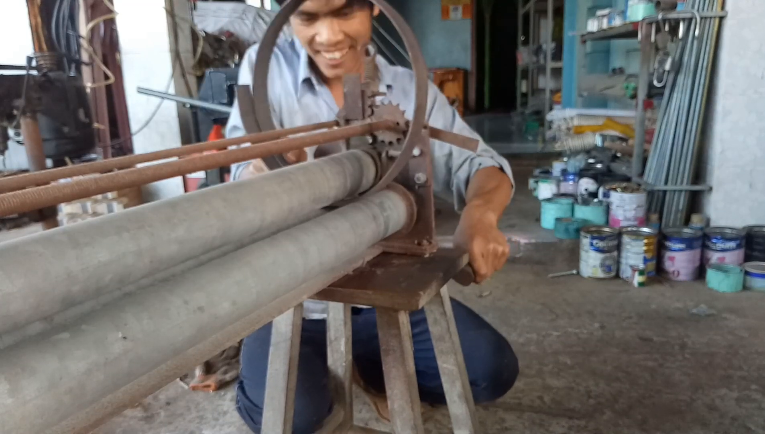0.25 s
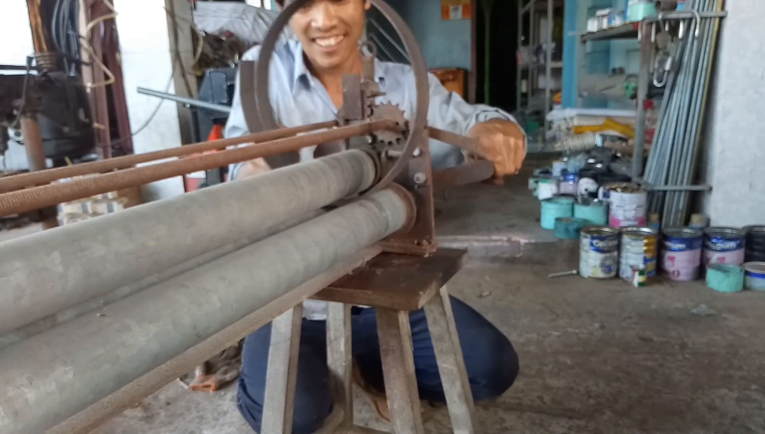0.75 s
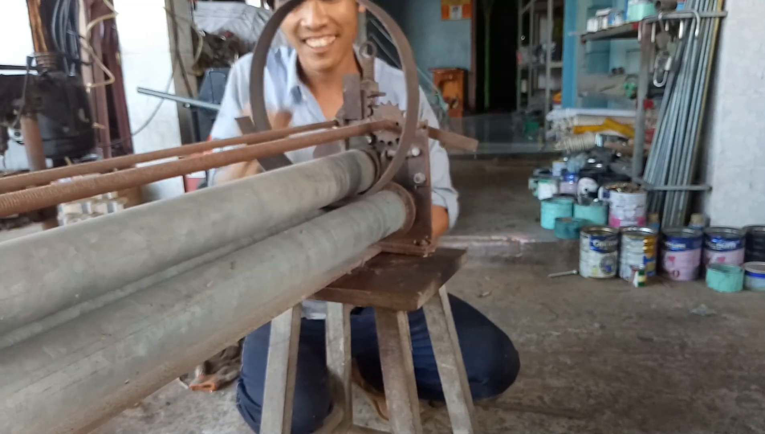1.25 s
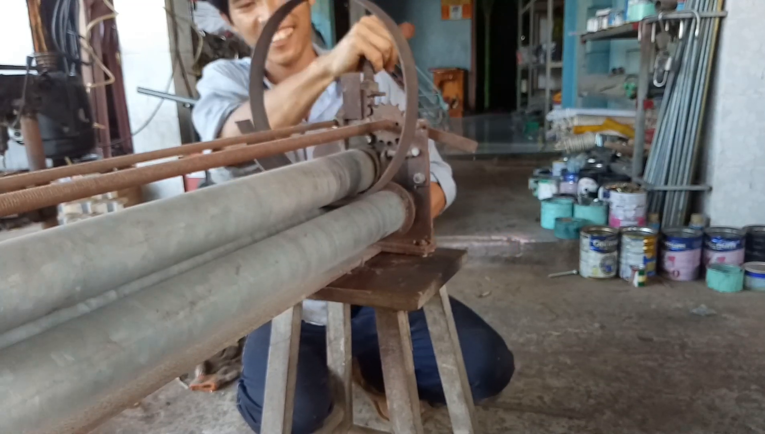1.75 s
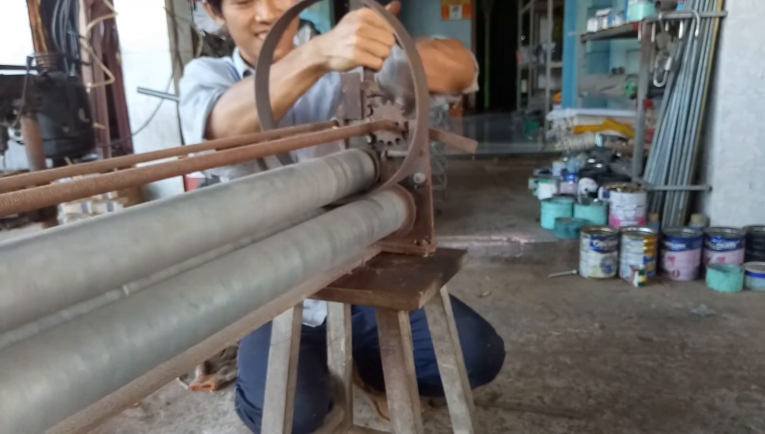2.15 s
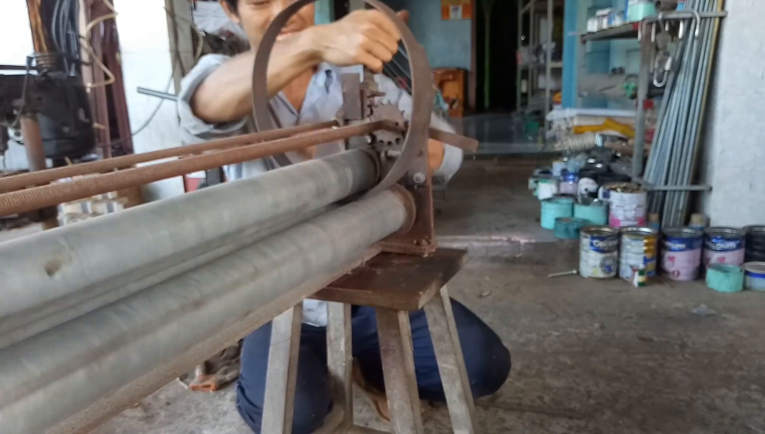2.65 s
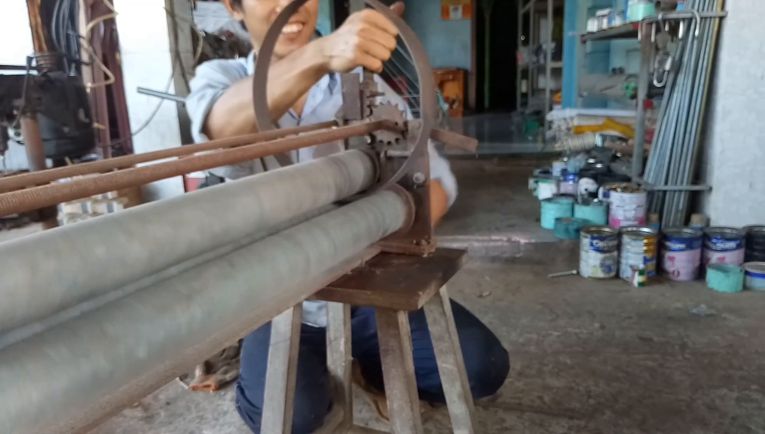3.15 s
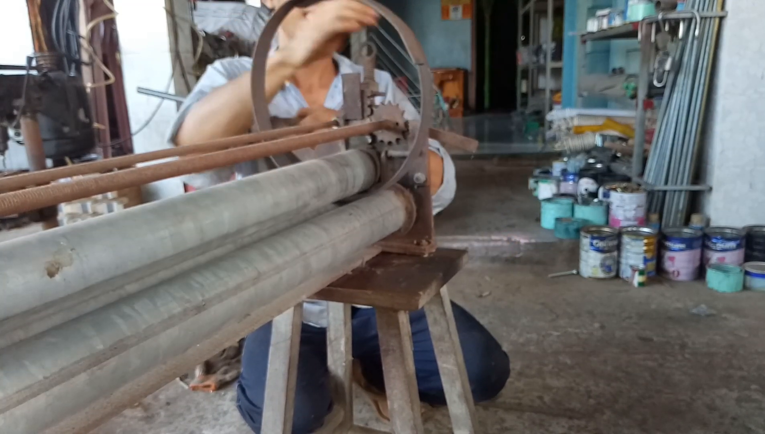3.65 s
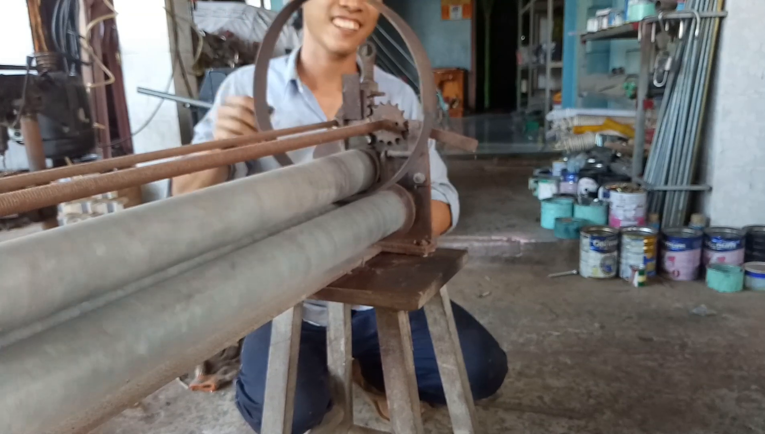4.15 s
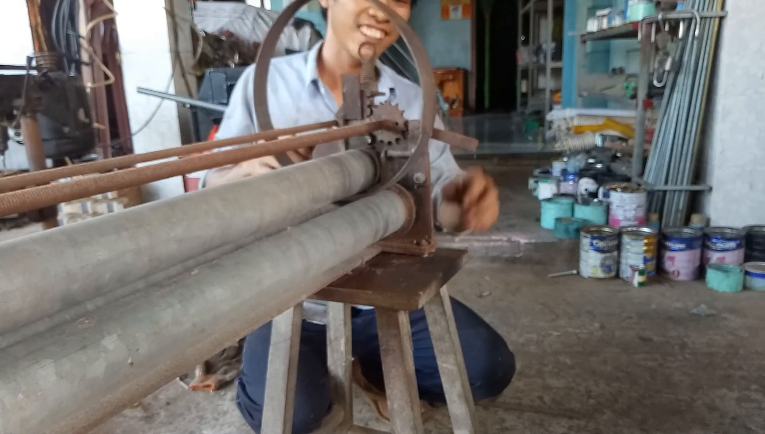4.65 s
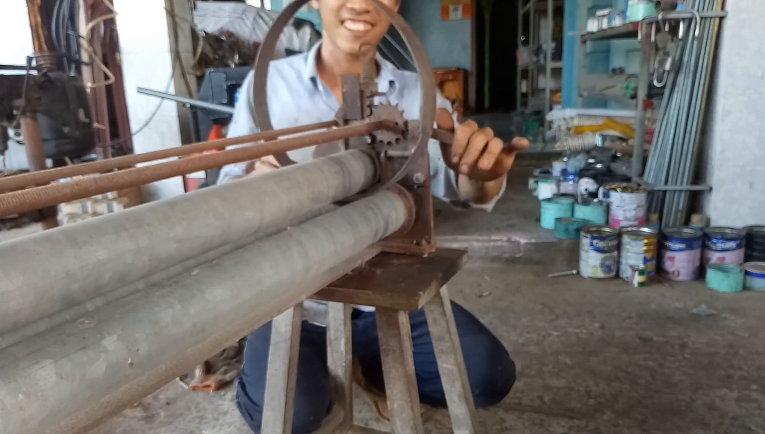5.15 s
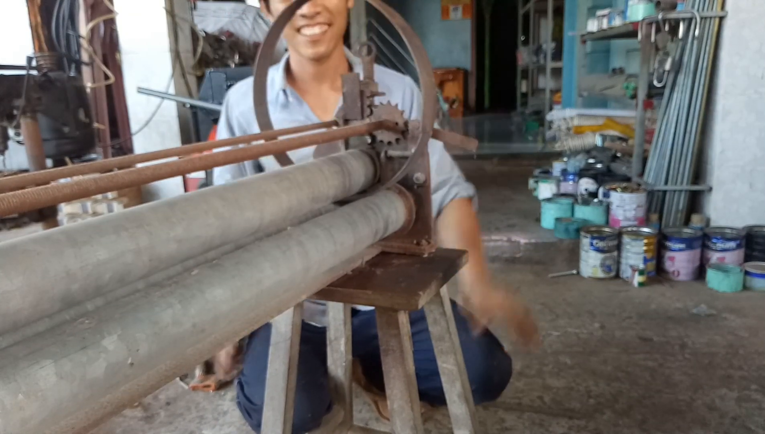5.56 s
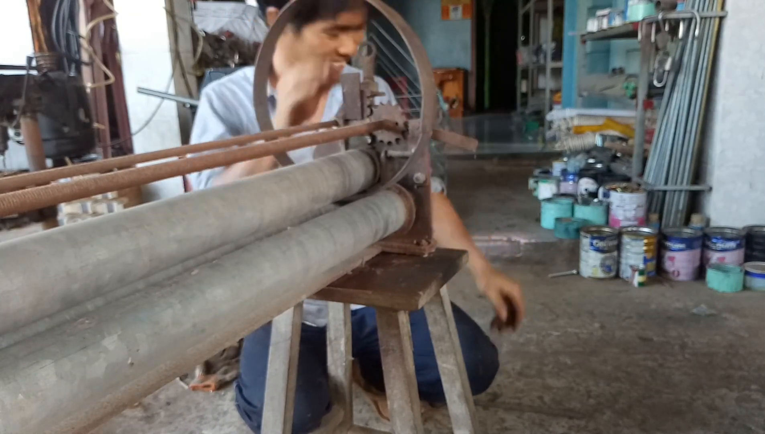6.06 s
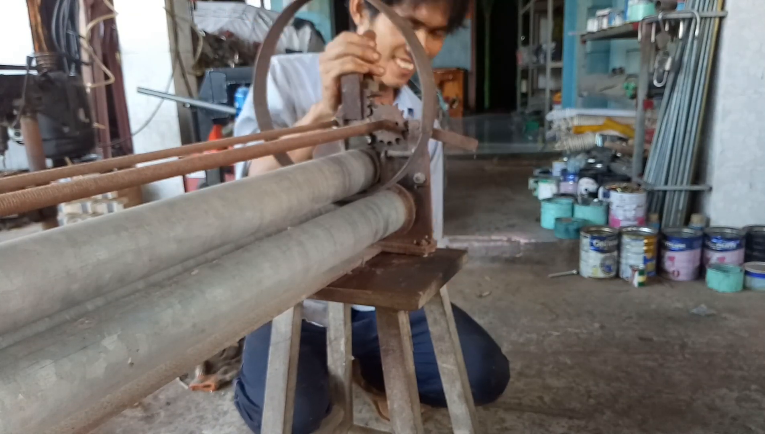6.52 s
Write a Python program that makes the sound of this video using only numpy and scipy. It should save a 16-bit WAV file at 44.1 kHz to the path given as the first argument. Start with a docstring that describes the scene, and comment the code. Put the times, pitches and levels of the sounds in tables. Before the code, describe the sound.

Loose gears and a crank bang sharply on a steel frame in an open workshop, with gritty grinding, tubular ringing and low traffic hum.

```python
"""An open workshop with a hand-cranked rolling machine: loose gears and the crank clank against a steel frame,
each blow a set of decaying sines over bursts of coloured noise. The teeth grind as noise heard through the frame,
the long hollow rollers keep ringing as slowly dying tones, and the stand knocks and a loose part taps.
Low hum and rumble of traffic lie behind as filtered noise, and their level drops after the last hard blow;
the blows leave a short tail in the shop.
"""
import sys
import numpy as np
from scipy import signal
from scipy.fft import rfft, irfft, next_fast_len
from scipy.io import wavfile
from scipy.ndimage import uniform_filter1d, map_coordinates

SR = 44100
rng = np.random.default_rng(int(sys.argv[2]) if len(sys.argv) > 2 else 0)


def store_wav(level_fs):
    """Save 16-bit WAV to argv[1]."""
    pcm = np.round(np.clip(np.atleast_2d(level_fs), -1, 1) * 32767)
    wavfile.write(sys.argv[1], SR, pcm.T.astype(np.int16))


def field_ratio(decibels):
    """Amplitude ratio for a level in dB (20 dB per decade); scalars and array-likes work."""
    return 10 ** (np.asarray(decibels, dtype=float) / 20)


N = 299439  # length [samples]

# All spectra are relative: their noise is levelled afterwards.
# quiet air of the shop: (frequency [Hz], density [dB per Hz])
AIR_SPECTRUM = [(150, -33.5), (250, -12.5), (600, -8.5), (1500, -20), (3600, -37.5), (4500, -9.5),
                (5000, -34), (10000, -34.5), (15800, -41)]
AIR_DB = -76  # rms level
# low background rumble: (frequency [Hz], density [dB per Hz])
RUMBLE_SPECTRUM = [(15, -34.5), (25, -23.5), (40, -16.5), (65, -11.5), (100, -3), (125, 2.5), (150, -10.5),
                   (250, -53.5)]
# far engine hum, resonances before squaring: (frequency [Hz], width [Hz], level [dB])
ENGINE_RESONANCES = [(148.8, 8.5, -0.5), (184.5, 8.5, -1.5), (208.5, 7.7, -3.5), (245, 35, -9),
                     (340, 32, -11)]
# level of the low background hum and rumble, which drops after the last hard blow:
# (time [s], engine hum level [dB], rumble level [dB])
BACKGROUND_LEVELS = [(0.0, -52.5, -57.5), (2.0, -49, -57.5), (2.5, -51, -57.5), (3.3, -45, -57.5),
                     (3.65, -63, -56), (5.07, -67.5, -59), (5.35, -79, -73.5), (6.17, -65, -60),
                     (6.79, -78, -79)]
# tail of the workshop: (frequency [Hz], 60 dB fall time [s])
SHOP_DECAY = [(300, 0.63), (2000, 0.34), (5000, 0.42), (12000, 0.1), (16000, 0.05)]

# hollow knocks in the stand: (time [s], knock level [dB], pitch [Hz])
STAND_KNOCKS = [(0.453, -34.5, 833), (0.515, -44.5, 1040), (0.803, -33.5, 1020), (0.842, -32.5, 1100),
                (1.129, -35.5, 873), (1.325, -25.5, 1100), (1.613, -39.5, 354), (2.038, -33.5, 623),
                (2.156, -34, 723), (2.229, -25.5, 502), (2.386, -30.5, 1290), (2.457, -25, 685),
                (2.836, -36, 750), (2.867, -37.5, 685), (2.933, -33, 480), (2.983, -30, 667),
                (3.102, -36.5, 1060), (3.172, -31.5, 1007), (3.199, -28.5, 750), (3.527, -40.5, 992),
                (3.684, -36, 976), (3.94, -51.5, 810), (4.042, -37, 1088), (4.24, -46, 956),
                (4.312, -35, 867), (4.325, -43.5, 470), (4.496, -45, 1016), (5.103, -25.5, 1070),
                (5.122, -33.5, 1080)]
# wooden stand: (frequency [Hz], density [dB per Hz])
STAND_SPECTRUM = [(150, -28), (250, -2.5), (964, 3.5), (1120, 1.5), (1300, 4.5), (1500, 1), (1950, -47),
                  (3300, -120)]
# the legs on the floor: (frequency [Hz], density [dB per Hz])
THUD_SPECTRUM = [(40, -24), (90, -4.5), (180, 2), (260, 1.5), (450, -31)]
HARD_KNOCK_DB = -25  # knock level at which puff and thud have the levels below
PUFF_DB, THUD_DB = -30, -44
PUFF_GROWS, THUD_GROWS = 1.9, 3  # dB per dB of knock

# light taps of a loose part settling: (time [s], tap level [dB])
LOOSE_TAPS = [(5.769, -53), (5.876, -47.5), (5.9878, -42), (6.103, -55), (6.2128, -55.5)]
# the loose part, resonances before squaring: (frequency [Hz], width [Hz], level [dB])
LOOSE_PART = [(1820, 170, -21), (2040, 120, 3), (2250, 130, 0.5), (2800, 106, 0), (3310, 26, -0.5),
              (4135, 120, 0.5)]

# blows that set the tubes ringing afresh:
# (time [s], big roller level [dB], lower tone level [dB], upper tone level [dB])
TUBE_BLOWS = [(0.454, -52, -55, -72), (0.7508, -50.5, -40.5, -61), (0.9044, -34, -34.5, -32.5),
              (1.134, -39, -49, -44), (1.3267, -45.5, -58, -54), (1.9524, -48, -57, -65),
              (2.146, -48, -68, -40), (2.47, -46, -39.5, -36), (2.623, -41.5, -32, -29),
              (2.981, -44.5, -38, -35.5), (3.1921, -48.5, -36.5, -43.5), (3.2856, -41, -28, -38.5),
              (3.6826, -46, -58, -56), (4.242, -55, -39.5, -64), (4.3126, -46.5, -40, -51),
              (5.1055, -43, -36, -33.5)]
# lower and upper tube tones: (frequency [Hz], 60 dB fall time [s], coupling added to the level [dB])
TUBE_TONES = [(1308.4, 1.3, -3), (3580, 1, -0.5)]
# close modes of the big roller that beat: (frequency [Hz], relative level [dB], 60 dB fall time [s])
BIG_ROLLER_MODES = [(1265.7, 0, 3.34), (1268.0, -12.6, 7.6), (1272.63, -3.2, 1.66), (1273.25, -5.6, 3.9)]
TURNING_HZ, TURNING_T60 = 1270.2, 2.07  # rolling contact blurs the modes into one wavering, shorter tone [s]
BUILD_S = 0.05  # the big tube takes up a blow slowly, through the frame
STOP = 4.7  # the crank comes to rest [s]

# steel frame and gears: (frequency [Hz], relative level [dB], relative ring time [1])
FRAME_MODES = [(1456, -13.5, 0.23), (1669, -6.5, 0.85), (2030, -17.5, 0.99), (2079, -2, .4),
               (2370, -20.5, 0.66), (2576, -1, 0.41), (3133, -8, 0.46), (3655, -9.5, 1), (3710, -7, 0.44),
               (3830, -5.5, 0.7), (3944, -6.5, 0.13), (4290, 1.5, 0.26), (4550, -4.5, 0.53),
               (4744, -7, 0.19), (6360, -19, 0.65), (6955, -8.5, 0.58), (6980, -14, .35),
               (6920, -25.5, 0.68), (6860, -13.5, 0.12), (7500, -25, 0.49), (8400, -30.5, 0.16),
               (8330, -27.5, 0.3), (10310, -24, 0.23), (10740, -27, 0.87)]
# dense small modes of the steel: (frequency [Hz], density [dB per Hz])
STEEL_SPECTRUM = [(590, -37.5), (1000, -14.5), (1200, -27), (1300, -5), (1520, -8.5), (1620, -5.5),
                  (2020, -0.5), (2210, -4.5), (3370, -6.5), (3710, -4), (4680, -4.5), (5130, -20.5),
                  (6000, -15), (7800, -53.5), (13200, -120)]
# sizzle of blows and dry scraping: (frequency [Hz], density [dB per Hz])
SIZZLE_SPECTRUM = [(2940, -25), (5000, -6), (5170, -16.5), (5640, -5), (6520, -6), (7110, -1.5),
                   (7980, -11), (10100, -8), (12000, -22.5), (15800, -52.5)]
# top edge of a hard blow: (frequency [Hz], density [dB per Hz])
SNAP_SPECTRUM = [(8000, -33.5), (11000, 3), (14000, -7), (15500, -11), (15900, -63.5)]
CLOUD_PATCHY_DB, TEETH_PATCHY_DB, SCRAPE_PATCHY_DB = 2.2, 4.5, 4  # depth of the random patches [dB]

# turning gears: (time [s], grind level [dB], stand rumble level [dB])
GEAR_LOAD = [(0.0, -64, -77.5), (0.3, -78, -75), (0.44, -54, -55), (0.6, -62, -72), (0.71, -45.5, -65),
             (0.76, -31, -46), (0.81, -49.5, -59.5), (1.25, -42.5, -51.5), (1.43, -57, -57),
             (1.75, -82, -101), (1.93, -46.5, -56), (2.06, -48, -45.5), (2.13, -47.5, -52.5),
             (2.48, -43, -46.5), (2.6, -37.5, -38), (2.85, -46, -56), (3.19, -38.5, -41.5), (3.5, -56, -58),
             (3.72, -72, -79), (4.09, -59.5, -75), (4.24, -55.5, -58.5), (4.44, -55.5, -66),
             (4.63, -78.5, -96), (5.1, -82, -79.5)]
FULL_LOAD_DB = -45  # grind level counted as full load
SCRAPE_DB, SCRAPE_GROWS = -54.5, 1.15  # dry scrape at full load; dB per dB of load

# blows of gear play and crank:
# (time [s], blow level [dB], sizzle re blow [dB], pitch of the struck part [Hz])
GEAR_CLANKS = [(0.0905, -51.5, -36, 3920), (0.171, -38.5, -49, 1990), (0.4226, -36, -26.5, 2850),
               (0.434, -33, -21.5, 1950), (0.4549, -25, -14.5, 2800), (0.641, -38, -8, 2100),
               (0.8021, -18, -20, 3780), (0.843, -18.5, -11, 4020), (0.8651, -7.5, -7, 4550),
               (0.906, -8.5, -9, 3970), (0.9465, -13.5, -15.5, 3600), (0.9855, -14, -17, 4580),
               (1.1301, -24.5, -18.5, 3570), (1.1803, -22, -18, 1790), (1.3232, -13, -23, 4604),
               (1.6089, -41.5, -28, 3690), (1.925, -37, -14, 2000), (1.953, -30.5, -15, 2110),
               (2.0025, -26, -18.5, 1860), (2.0397, -26.5, -22.5, 2180), (2.113, -29.5, -6.5, 1910),
               (2.1481, -20.5, -6.5, 4300), (2.2265, -37, -20, 3480), (2.2722, -21.5, -36.5, 2195),
               (2.386, -29.5, -19, 1900), (2.4266, -31, -28, 1870), (2.4718, -17.5, -23, 2030),
               (2.541, -8.5, -17, 4320), (2.5796, -14.5, -17.5, 4290), (2.625, -9.5, -15.5, 3720),
               (2.6385, -20, -6.5, 4170), (2.7573, -22, -29, 3835), (2.837, -38.5, -24.5, 3580),
               (2.8677, -30, -7.5, 3750), (2.9805, -12, -14, 1730), (3.0515, -19.5, -12.5, 2450),
               (3.189, -27, -19, 1880), (3.2001, -7.5, -14, 3830), (3.244, -12, -12.5, 2050),
               (3.2894, -17.5, -19.5, 2124), (3.5249, -39, -21, 3580), (3.6824, -31, -29, 2030),
               (4.0417, -39.5, -25, 3810), (4.138, -38.5, -23, 1930), (4.2423, -30.5, -49, 2030),
               (4.3127, -20, -23, 2026), (4.4965, -38, -25, 1926), (4.547, -42, -14, 3920),
               (5.0955, -19, -23.5, 3950), (5.105, -12, -20, 4500), (5.1197, -11.5, -17, 3700),
               (5.689, -49, -19, 3850)]
RING_T60, RING_FALLS = 0.29, 0.4  # base ring of a 2 kHz part [s], scaled layer by layer; power of its fall with pitch
AT_REST_RINGS = 2.24  # factor: parts ring longer once the gears stand
CRACK_FALL, CRACK_SHARE = 0.008, 2.5  # first contact of steel on steel: 30 dB fall [s], energy re slower decay
AFTERGLOW_DB, AFTERGLOW_T60 = -40, 1.2  # faint long shimmer of the frame: dB re blow, s


def unit(x):
    """Scaled to rms 1."""
    return x / np.sqrt(np.mean(x ** 2) + 1e-20)


def along(points, hz):
    """(frequency [Hz], value) points read on a log axis."""
    f, v = np.transpose(points)
    return np.interp(np.log(hz + 1), np.log(f + 1), v)


def curves(rows):
    """One value per sample for each column after the time."""
    s, *cols = np.transpose(rows)
    return [np.interp(np.arange(N) / SR, s, c) for c in cols]


def wobble(rate):
    """A smooth random curve, rate knots a second."""
    knots = rng.standard_normal(int(N * rate / SR) + 4)
    return map_coordinates(knots, [np.arange(N) * rate / SR])


def filtered(x, response):
    """x times a complex response of frequency."""
    m = next_fast_len(N + SR)
    return irfft(rfft(x, m) * response(np.fft.rfftfreq(m, 1 / SR)), m)[:N]


def noise(spectrum):
    """Coloured noise of rms 1."""
    return unit(filtered(rng.standard_normal(N), lambda hz: field_ratio(along(spectrum, hz))))


def resonances(peaks):
    """Causal response of (frequency [Hz], width [Hz], level [dB]) resonances, signs alternating."""
    def response(f):
        return sum((-1) ** k * field_ratio(db) * 1j * f * w / (c * c - f * f + 1j * f * w)
                   for k, (c, w, db) in enumerate(peaks))
    return response


def resonant_noise(peaks):
    """Noise of rms 1 through the squared resonances."""
    return unit(filtered(rng.standard_normal(N), lambda hz: resonances(peaks)(hz) ** 2))


def decays(t):
    """A soft start and a 60 dB fall in t60 (30 dB where the curve is used as an energy)."""
    return lambda t60, attack=.0006: field_ratio(-60 * t / t60) * (1 - np.exp(-t / attack))


def steel(spectrum, patchy_db):
    """Noise heard through the frame: its modes stand out, and patches of the noise swell and sink at random."""
    frame = resonances([(hz, 14 / ring, 0) for hz, db, ring in FRAME_MODES])
    through_frame = filtered(noise(spectrum), lambda hz: 1.5 + frame(hz))
    z = signal.stft(through_frame, nperseg=512)[2]
    field = uniform_filter1d(rng.standard_normal(z.shape), size=3, axis=0)  # smooth over frequency
    field = uniform_filter1d(field, size=22, axis=1)  # and over time
    return unit(signal.istft(z * field_ratio(patchy_db * unit(field)), nperseg=512)[1][:N])


def air():
    """The quiet air of the shop: steady coloured noise."""
    return field_ratio(AIR_DB) * noise(AIR_SPECTRUM)


def traffic():
    """Wavering engine hum and low rumble: resonant and coloured noise, dropping after the last hard blow."""
    engine_db, rumble_db = curves(BACKGROUND_LEVELS)
    hum = field_ratio(engine_db + 2.0 * wobble(17)) * resonant_noise(ENGINE_RESONANCES)
    rumble = field_ratio(rumble_db + 3.5 * wobble(27)) * noise(RUMBLE_SPECTRUM)
    return hum + rumble


def shop_tail(x):
    """The workshop's tail: each frequency dies at its own speed, a new tail for every stretch of sound."""
    wet, step = np.zeros(N + 2 * SR), SR // 4
    for start in range(0, N, step):
        hz, t, z = signal.stft(rng.standard_normal(SR // 2), SR, nperseg=256)
        fall = field_ratio(-60 * t / along(SHOP_DECAY, hz)[:, None])
        tail = signal.istft(z * fall, SR, nperseg=256)[1]
        answer = signal.fftconvolve(x[start:start + step], tail / np.linalg.norm(tail))
        wet[start + 300:][:len(answer)] += answer  # delayed by 300 samples
    return wet[:N]


def taps():
    """Each tap is a brief rubbing shudder in the part's resonances, cut off as it comes to rest."""
    t, shake = np.arange(SR // 4) / SR, np.zeros(N + SR)
    for s, db in LOOSE_TAPS:
        fall = field_ratio(db - 12.5 - 60 * (t / 0.15) ** 1.46)
        shake[round(s * SR):][:len(t)] += fall * (1 - np.exp(-t / 0.00084))
    return shake[:N] * resonant_noise(LOOSE_PART)


def knocks():
    """A dull note of the stand with a short wooden puff; hard knocks thud into the floor."""
    t = np.arange(SR // 4) / SR
    fall = decays(t)
    note, puff, thud = np.zeros((3, N + SR))
    for s, db, hz in STAND_KNOCKS:
        at = slice(round(s * SR), round(s * SR) + len(t))
        hardness_db = db - HARD_KNOCK_DB
        note[at] += field_ratio(db + 1.0) * np.sin(2 * np.pi * hz * t) * fall(0.037)
        puff[at] += field_ratio(PUFF_DB + PUFF_GROWS * hardness_db) * fall(0.15)
        thud[at] += field_ratio(THUD_DB + THUD_GROWS * hardness_db) * fall(0.56, attack=0.0074)
    return note[:N] + puff[:N] * noise(STAND_SPECTRUM) + thud[:N] * noise(THUD_SPECTRUM)


def rollers():
    """The hollow tubes hum on long-lived tones; close mode pairs make them waver."""
    t = np.arange(N) / SR
    s, big_db, *levels = np.transpose(TUBE_BLOWS)
    last = np.searchsorted(s, t) - 1  # a new blow stops the old ring and starts its own
    since = np.where(last < 0, 99, t - s[last])  # 99 s: silent before the first blow

    def tone(hz, db):
        return field_ratio(db + 1.3 * wobble(13)) * np.sin(2 * np.pi * hz * t + 0.93 * wobble(11))

    def pair(hz, db):
        return tone(hz, db) + tone(hz - 9, db - 12)

    struck = sum(pair(hz, db[last] + coupling_db - 60 * since / t60)
                 for (hz, t60, coupling_db), db in zip(TUBE_TONES, levels))
    free = sum(field_ratio(big_db[last] + db - 60 * since / t60) * np.sin(2 * np.pi * hz * since)
               for hz, db, t60 in BIG_ROLLER_MODES)
    free = free * (1 - np.exp(-since / BUILD_S))
    rolling = tone(TURNING_HZ, big_db[last] + 2.5 * wobble(9) - 60 * since / TURNING_T60)
    return np.where(s[last] < STOP, rolling, free) + struck


def grind():
    """Rough teeth feed the frame with dense uneven grains; the stand rumbles and dry surfaces scrape."""
    grind_db, rumble_db = curves(GEAR_LOAD)
    scrape_db = SCRAPE_DB + SCRAPE_GROWS * (grind_db - FULL_LOAD_DB)
    caught = (rng.random(N) < 70 / SR) * (np.arange(N) < STOP * SR)  # single teeth, about 70 a second
    ticks = caught * rng.random(N)
    tick_fall = field_ratio(-60 * np.arange(SR // 10) / SR / 0.02)
    bite = 1 + 0.44 * signal.fftconvolve(ticks, tick_fall)[:N]
    load_db = 1.7 * wobble(11.0) + 20 * np.log10(unit(bite))
    teeth = field_ratio(grind_db + load_db + 1.2 * wobble(60)) * steel(STEEL_SPECTRUM, TEETH_PATCHY_DB)
    scrape = field_ratio(scrape_db + load_db + 0.58 * wobble(60)) * steel(SIZZLE_SPECTRUM, SCRAPE_PATCHY_DB)
    rumble = field_ratio(rumble_db + 1.2 * wobble(49)) * noise(STAND_SPECTRUM)
    return teeth + scrape + rumble


def afterglow():
    """After each blow the frame's many small modes shimmer on, faint and long."""
    s, db = np.transpose(GEAR_CLANKS)[:2]
    blows = np.bincount(np.round(s * SR).astype(int), field_ratio(2 * (db + AFTERGLOW_DB)), N)  # energies
    energy_fall = field_ratio(-120 * np.arange(2 * SR) / SR / AFTERGLOW_T60)
    energy = signal.fftconvolve(blows, energy_fall)[:N]
    return np.sqrt(np.abs(energy)) * steel(STEEL_SPECTRUM, patchy_db=8.5)


def clanks():
    """Each blow rings the frame modes, most near the struck part's pitch, over a fast-dying cloud of small modes."""
    t = np.arange(SR // 2) / SR
    fall = decays(t)
    hz, level_db, mode_ring = np.transpose(FRAME_MODES)[:, :, None]
    flutter = np.array([wobble(30)[:SR] for _ in FRAME_MODES])  # each mode is a cluster of close lines
    sines = np.sin(2 * np.pi * hz * np.arange(SR) / SR + 1.4 * flutter)
    sines = field_ratio(4.14 * flutter[::-1]) * sines
    bright = hz > 5200  # these modes follow the sizzle
    skips = rng.integers(len(t), size=len(GEAR_CLANKS))  # each blow starts elsewhere in the sines
    scatter = rng.standard_normal((len(GEAR_CLANKS), len(FRAME_MODES), 1))
    ring, cloud, sizzle, snap = np.zeros((4, N + SR))
    for (s, db, sizzle_db, part_hz), chance, skip in zip(GEAR_CLANKS, scatter, skips):
        at = slice(round(s * SR), round(s * SR) + len(t))
        octaves = np.log2(part_hz / 2000)
        life = RING_T60 * 2 ** (-RING_FALLS * octaves) * (AT_REST_RINGS if s > STOP else 1)
        near_db = 8 * np.exp(-(np.log(hz / part_hz) / 0.28) ** 2)
        mode_db = db + level_db - 23.5 + near_db + 2.0 * chance + bright * (sizzle_db + 8.5)
        modes = field_ratio(mode_db) * sines[:, skip:skip + len(t)] * fall(mode_ring * life * 1.57)
        ring[at] += np.sum(modes, axis=0)
        ring[at] += field_ratio(db - 11) * np.sin(2 * np.pi * part_hz * t) * fall(life * 0.26)  # the struck part itself
        # cloud and sizzle add as energies
        crack = CRACK_SHARE * fall(CRACK_FALL)
        cloud[at] += field_ratio(2 * (db - 13)) * (fall(life * 0.28) + .8 * fall(0.016) + crack)
        sizzle[at] += field_ratio(2 * (db + sizzle_db - 4.0)) * (fall(life * 0.28) + crack)
        snap[at] += field_ratio(1.5 * db + sizzle_db - 19) * fall(0.081)  # harder blows reach higher
    small_modes = np.sqrt(cloud[:N]) * steel(STEEL_SPECTRUM, CLOUD_PATCHY_DB)
    treble = np.sqrt(sizzle[:N]) * steel(SIZZLE_SPECTRUM, patchy_db=-4.0)
    return ring[:N] + small_modes + treble + snap[:N] * noise(SNAP_SPECTRUM)


def scene():
    """The traffic and the air, the machine, and the tail its blows leave in the shop."""
    blows = clanks() + knocks() + taps()
    machine = blows + afterglow() + grind() + rollers()
    return (air() + traffic() + field_ratio(-7.5) * shop_tail(blows) + machine)[None]


def band_limit(x):
    """A steep low-pass at the top of the band."""
    return signal.sosfilt(signal.butter(12, 15990, fs=SR, output="sos"), x)


def record(dry):
    """The scene as it stands is the finished mix."""
    return band_limit(dry)


dry = scene()
out = record(dry)
store_wav(out)
```